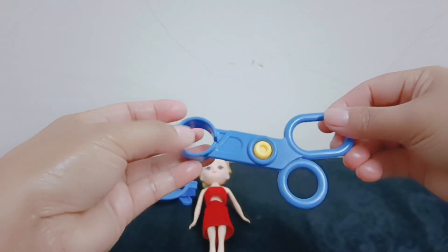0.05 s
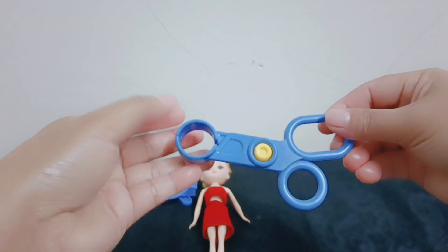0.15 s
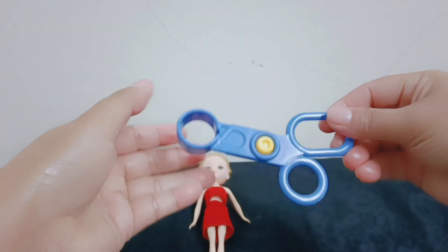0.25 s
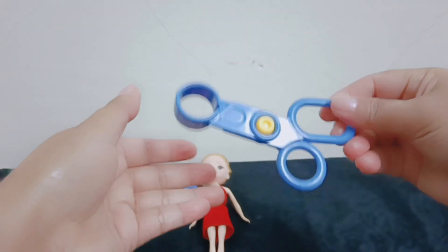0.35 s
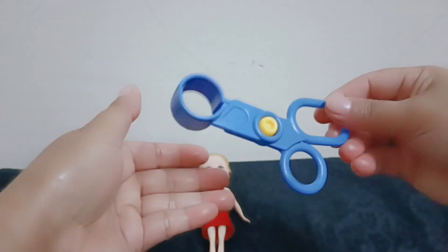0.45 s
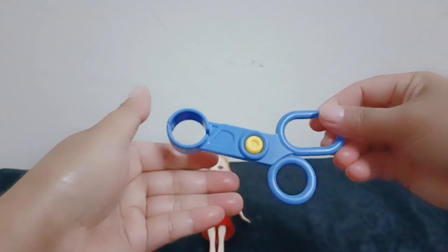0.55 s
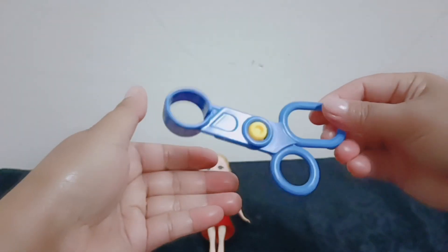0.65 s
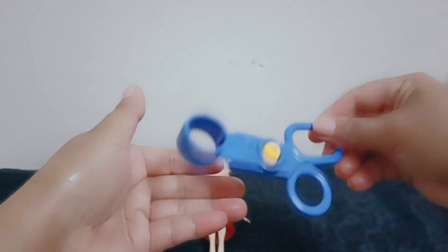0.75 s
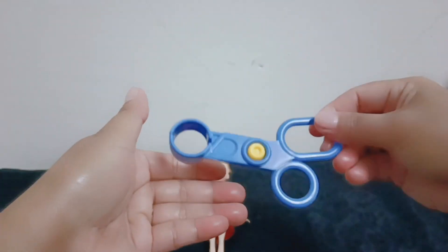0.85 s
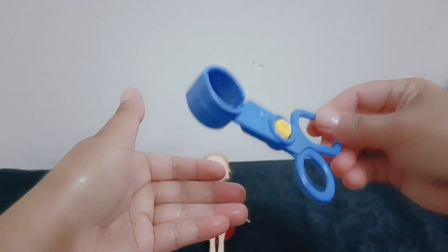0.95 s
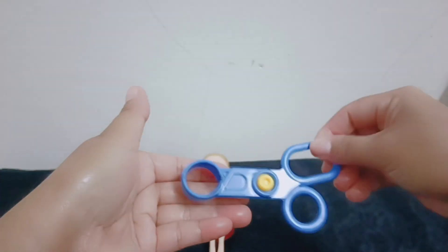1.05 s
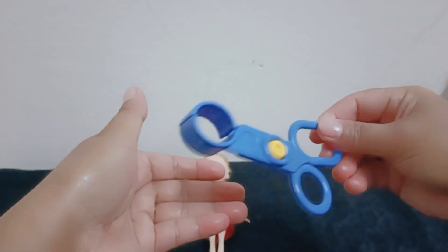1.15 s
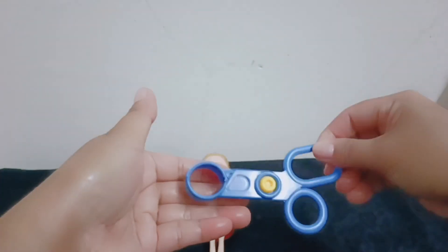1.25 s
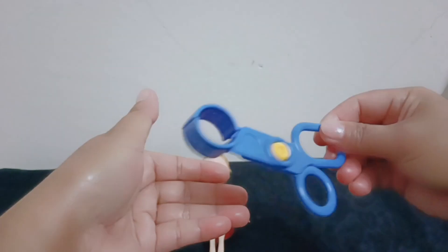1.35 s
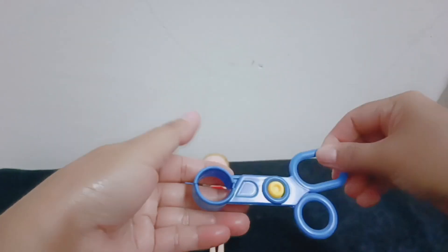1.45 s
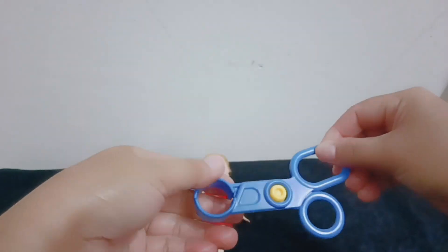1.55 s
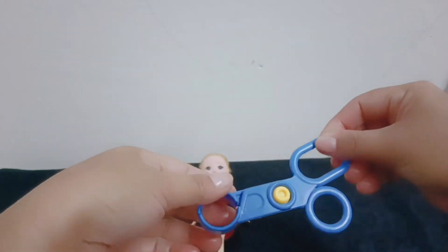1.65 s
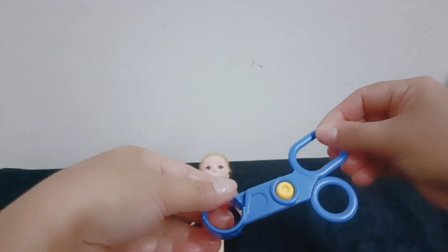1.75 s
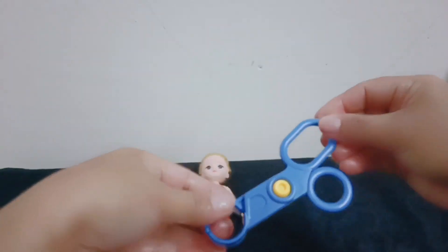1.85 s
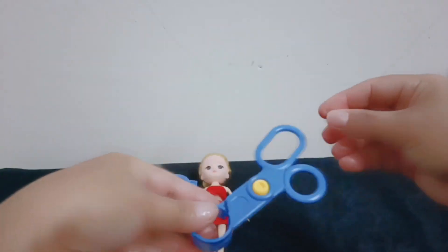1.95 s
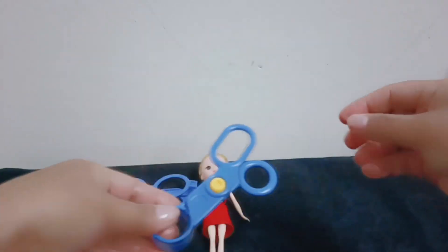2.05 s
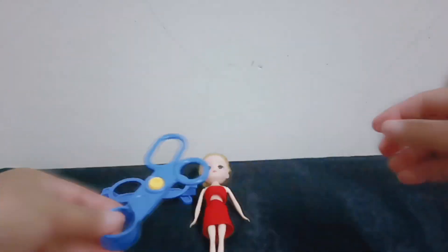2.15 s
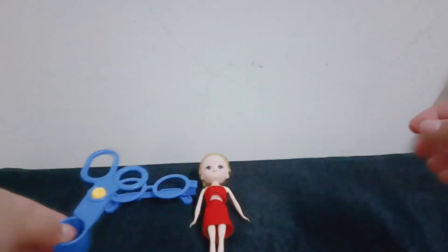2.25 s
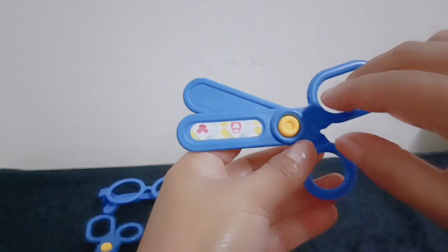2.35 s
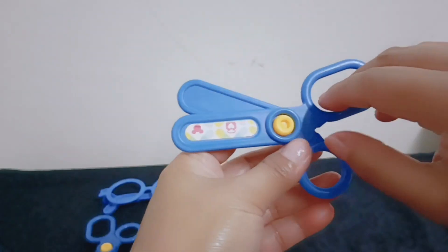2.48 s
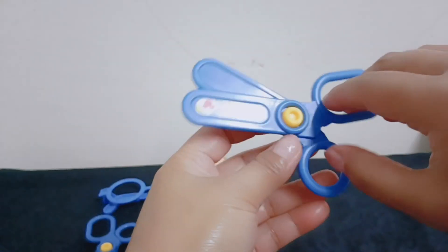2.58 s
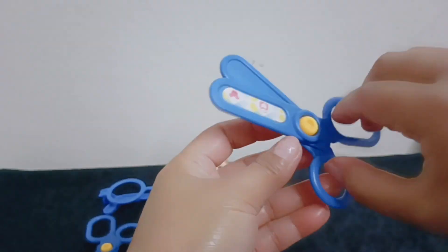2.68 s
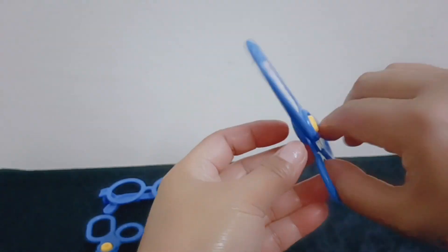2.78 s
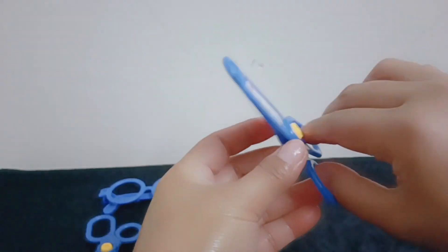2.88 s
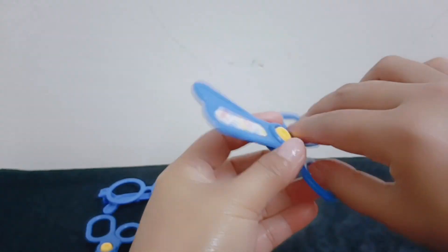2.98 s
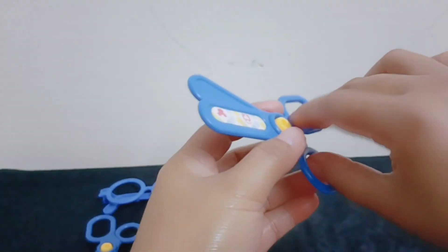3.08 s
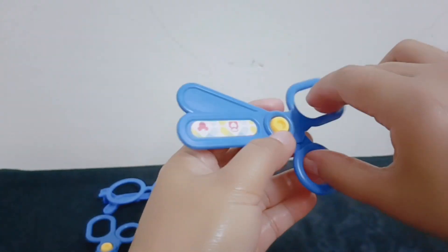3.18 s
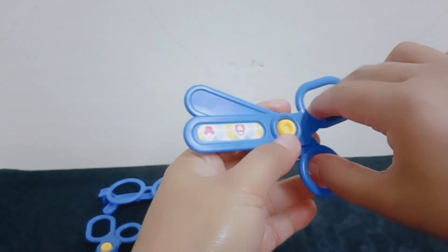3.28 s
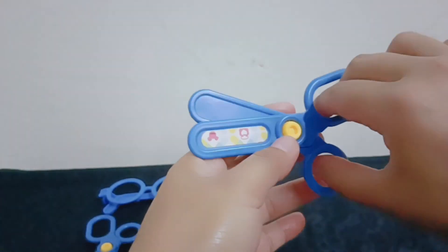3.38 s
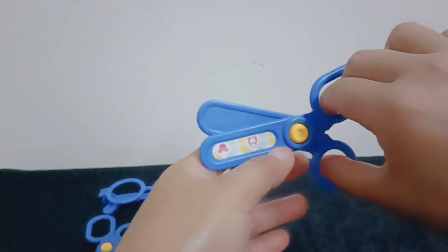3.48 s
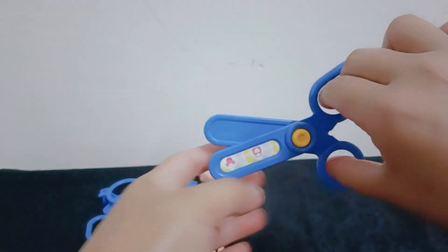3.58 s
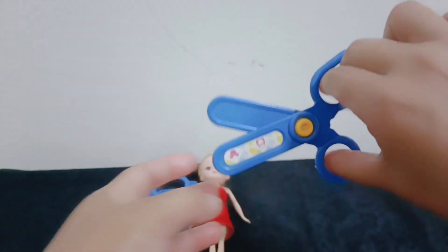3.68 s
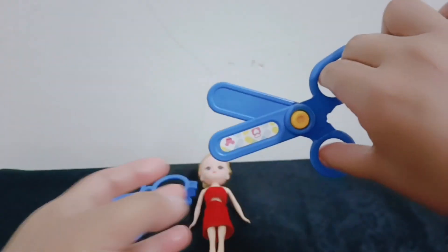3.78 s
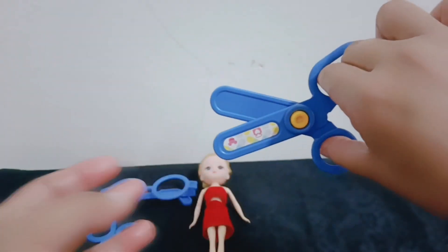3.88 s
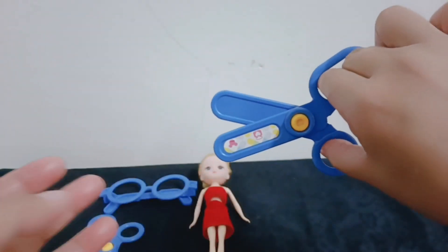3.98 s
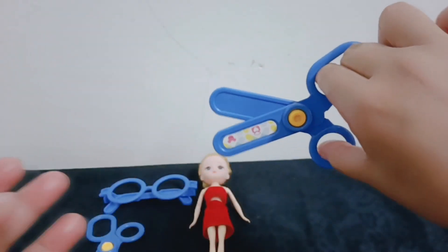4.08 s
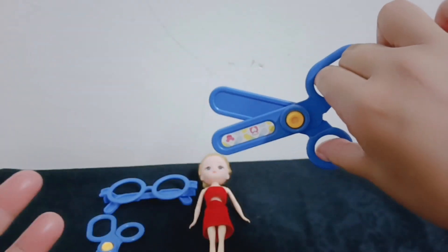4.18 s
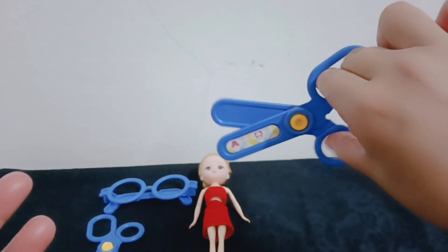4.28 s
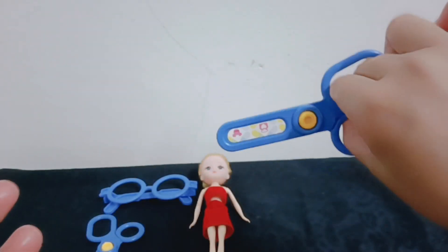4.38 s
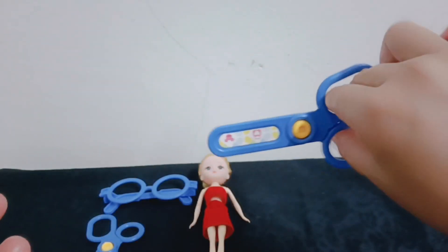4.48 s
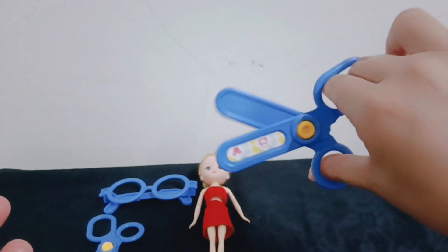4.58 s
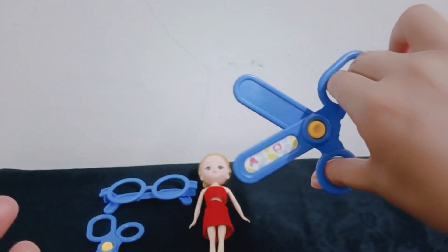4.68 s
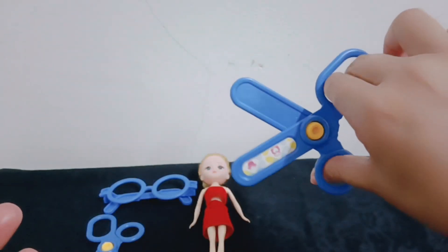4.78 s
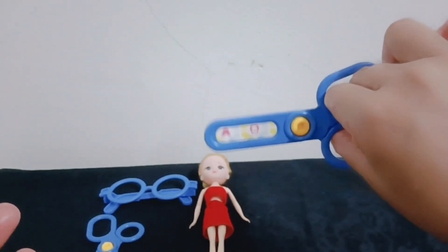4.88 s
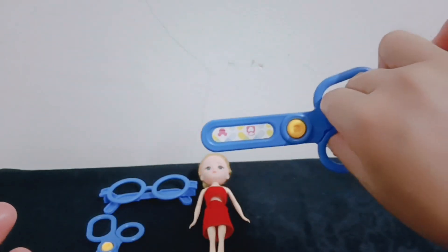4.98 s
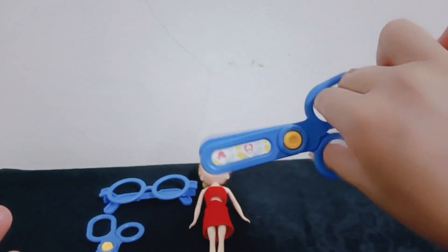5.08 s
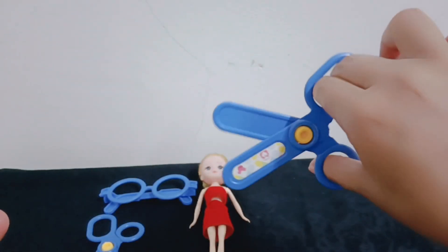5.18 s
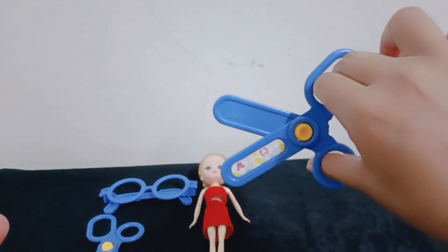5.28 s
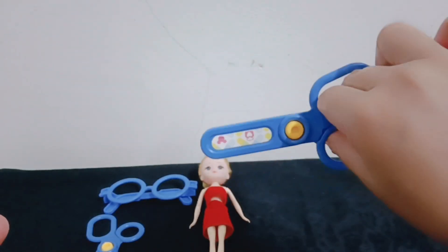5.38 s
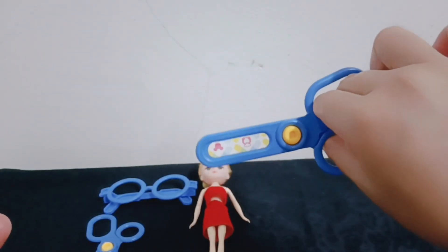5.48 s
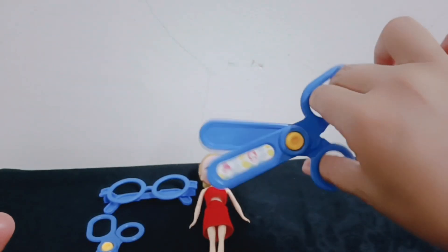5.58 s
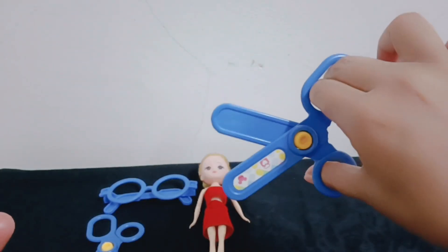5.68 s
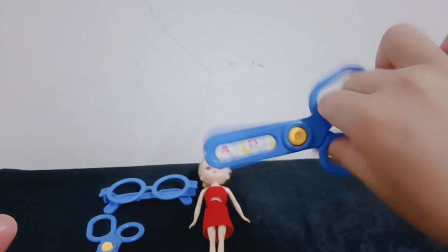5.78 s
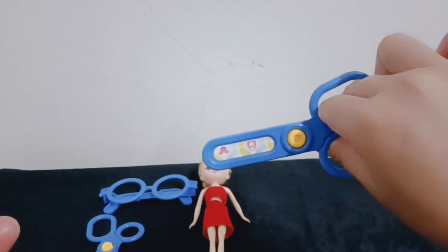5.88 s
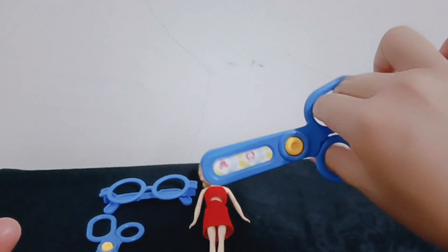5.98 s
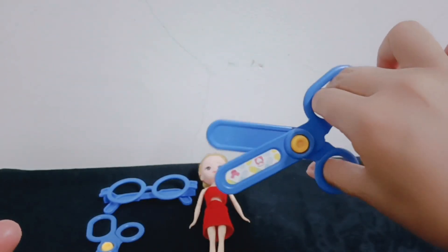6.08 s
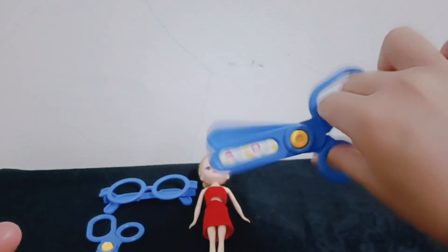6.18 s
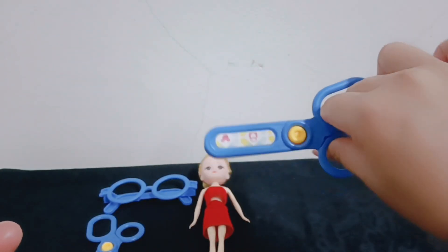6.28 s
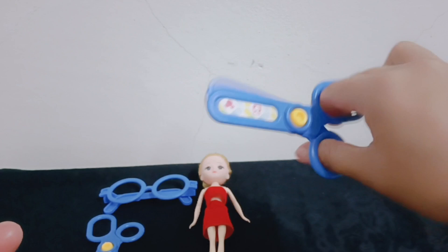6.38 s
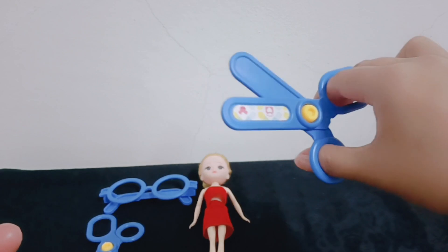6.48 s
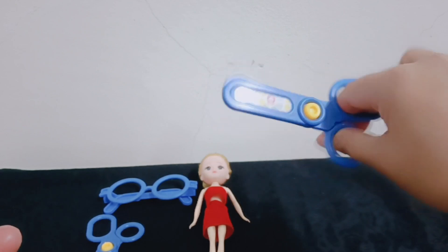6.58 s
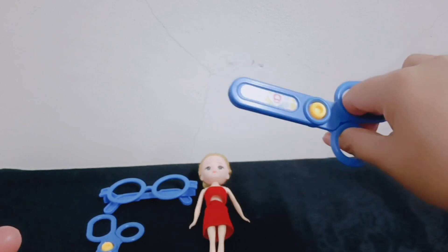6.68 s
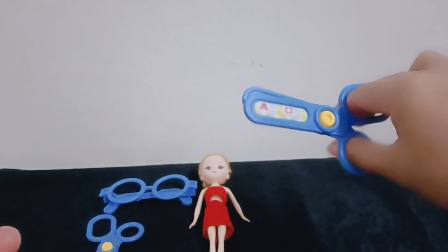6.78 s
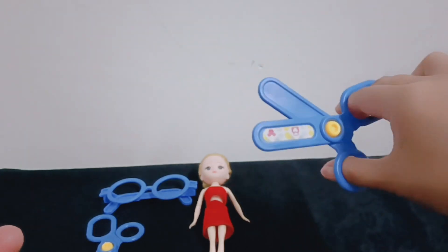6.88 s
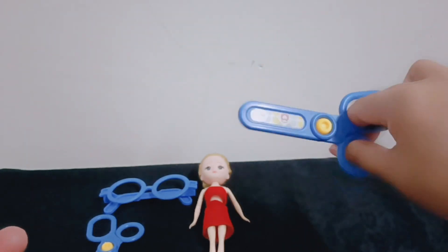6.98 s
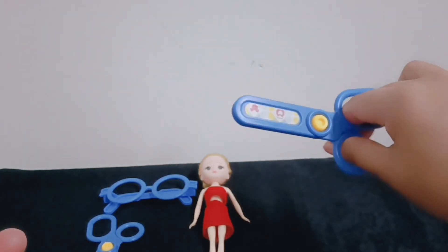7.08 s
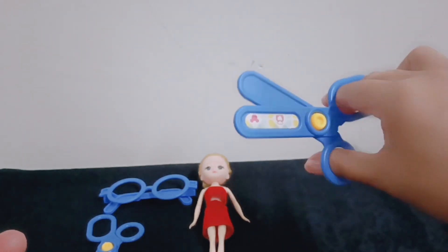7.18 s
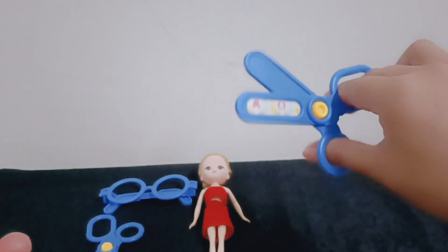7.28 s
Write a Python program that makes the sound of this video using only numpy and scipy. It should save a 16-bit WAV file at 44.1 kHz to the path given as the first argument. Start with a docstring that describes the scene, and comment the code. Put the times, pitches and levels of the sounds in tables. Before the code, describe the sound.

In a small bare room, close to a stereo microphone, a hard plastic toy is tapped on a palm four times, with soft fleshy thumps beneath. The sound cuts out briefly and fades back into faint handling rustle. Dull thuds roll through the building, then plastic scissors snap shut seven times, bright and dry, with scratchy rubs as they reopen. A faint distant groan comes near the end.

```python
"""A toy clamp is tapped on a palm, then toy scissors snap shut and rub open, close to a two-port microphone
in a small bare room. Blows ring damped plastic modes, rubs are stick-slip noise through resonances, and
decaying noise is the walls' reply. Heavy thuds roll in from elsewhere in the building as resonant noise, and
something groans once, far off, in wavering tones. Coloured noise is the room tone.
The sound drops out for a moment between the two toys and fades back in."""
import sys
import numpy as np
from scipy import signal
from scipy.fft import rfft, irfft
from scipy.io import wavfile

SR = 44100
rng = np.random.default_rng(int(sys.argv[2]) if len(sys.argv) > 2 else 0)


def dump_mix(stems):
    """Bounce the given channels to the path in sys.argv[1] as a 16-bit WAV at rate SR."""
    frames = np.atleast_2d(stems).T  # one column per channel
    limited = np.clip(frames, -1, 1)  # hard clip at full scale
    pcm = np.round(limited * 32767).astype(np.int16)
    wavfile.write(sys.argv[1], SR, pcm)


N = 323694
SWELL_RISE = 0.67   # rise of a swell as a share of its fall

# All levels are relative: later gains still apply.
# Modes of the plastic scissors. Each row: frequency in Hz, level in dB, 60 dB decay time in seconds.
SCISSORS_MODES = [(1566, 5.5, 0.0063), (1860, 12.5, 0.01), (2148, 6.5, 0.01), (3050, -8, 0.01),
                  (3530, -2.5, 0.0046), (4200, -9, 0.0053), (4720, 0.5, 0.0059), (5275, 2.5, 0.007),
                  (5770, 6, 0.007), (6560, 3.5, 0.005), (6780, -1, 0.004), (7530, -3, 0.0058),
                  (8800, -11.5, 0.004), (9500, -9, 0.0076), (10040, -9.5, 0.023), (10590, -7.5, 0.0079),
                  (12050, -6, 0.004), (13500, -11, 0.003), (15200, -9.5, 0.0046)]
# Likeness of the ports in the room tone. Each row: frequency in Hz, left-right correlation (0 to 1).
PORT_LIKENESS = [(60, 0.011), (130, 0.94), (290, 0.41), (640, 0.24), (1400, 0), (15000, 0)]


def from_db(db):
    """Decibels to amplitude ratio."""
    return 10 ** (np.asarray(db) / 20)


def rms_one(x):
    """Scale to unit effective value."""
    return x / np.sqrt(np.mean(x ** 2) + 1e-20)


def in_time(rows):
    """Columns of a curve at every sample by linear interpolation; -140 dB outside its span."""
    s, *columns = np.transpose(rows)
    return [np.interp(np.arange(N) / SR, s, c, -140, -140) for c in columns]


def at_hz(points, hz, column=1):
    """One column of a curve, interpolated over logarithmic frequency."""
    points = np.array(points)
    return np.interp(np.log(hz), np.log(points[:, 0]), points[:, column])


def ring(clicks, hz, t60):
    """Damped oscillator: a unit click sets a sine of initial height 1 ringing."""
    r, w = from_db(-60 / (t60 * SR)), 2 * np.pi * hz / SR
    return signal.lfilter([0, np.sin(w)], [1, -2 * r * np.cos(w), r * r], clicks + 1e-18)


def resonate(x, peaks):
    """Parallel resonances (Hz, width Hz, dB), each passed twice for deep valleys; rms 1."""
    out = 0
    for k, (hz, width_hz, level_db) in enumerate(peaks):
        r = np.exp(-np.pi * width_hz / SR)
        b = (1 - r * r) / 2 * np.array([1, 0, -1])
        a = [1, -2 * r * np.cos(2 * np.pi * hz / SR), r * r]
        twice = signal.lfilter(b, a, signal.lfilter(b, a, x))
        out = out + (-1) ** k * from_db(level_db) * twice
    return rms_one(out)


def slow_noise(hz, shape):
    """Random fluctuation: white noise kept below a cutoff."""
    return signal.sosfilt(signal.butter(2, hz, fs=SR, output="sos"), rng.standard_normal(shape))


def correlate_ports(mid, side, alike):
    """Partial correlation: two channels from a shared part and an opposed part."""
    alike = np.clip(alike, 0, 1)
    return np.sqrt(1 + alike) * mid + np.sqrt(1 - alike) * side * [[1], [-1]]


def stereo_noise(alike):
    """White noise in two partially correlated channels."""
    mid, side = rng.standard_normal((2, N))
    return correlate_ports(mid, side, alike)


def bands():
    """Third-octave analysis: band-passes with their centres in Hz."""
    edges = 35 * 2 ** np.arange(0, 9.1, 1 / 3)
    return [(np.sqrt(low * high), signal.butter(2, [low, high], "band", fs=SR, output="sos"))
            for low, high in zip(edges, edges[1:])]


def swell(s, rise, fall, level_db, t=None):
    """A bell-shaped envelope with its own rise and fall in seconds."""
    t = (np.arange(N) / SR if t is None else t) - s
    return from_db(level_db) * np.exp(-2 * (t / np.where(t < 0, rise, fall)) ** 2)


def swells(rows):
    """Superposition of bell-shaped envelopes (s, length s, dB)."""
    return sum(swell(s, SWELL_RISE * length, length, level_db) for s, length, level_db in rows)


def clamp_taps():
    """Impact excitation of the clamp, with the walls' reply to it."""
    # Each row: start in seconds, strength in dB, tilt in dB per octave, knock in dB, knock tilt in dB per
    # octave, middle in dB, walls in dB, rebound delay in ms, rebound in dB (at most -2), left-right in dB.
    taps = [(0.8117, -29.5, 2, 4, 3.5, -1, 6, 1.0, 9, -6),
            (0.8160, -17.5, -1.5, -9, 11, 7, 1, 1.9, -13, 1.5),
            (1.0350, -6.5, 5.5, 21, -8.5, 7.5, 2.1, 2.7, -14.5, 0.5),
            (1.2553, -11, -0.5, -10, 7, 2, 4.5, 2.2, -9.5, -1),
            (1.4464, -18, 3.5, 10.5, 12, -0.5, 5.5, 2.1, -2, -0.5)]
    # Modes of the clamp. Each row: frequency in Hz, level in dB, 60 dB decay time in seconds.
    modes = [(1150, -16, 0.0045), (1430, -9.5, 0.006), (1890, -12, 0.017), (2820, -18, .005),
             (3720, -7, 0.0034), (4170, -7, 0.0036), (4870, 0, 0.0034), (5430, -3.5, 0.0053),
             (6110, -1, 0.0044), (6900, -6, 0.003), (7500, -19.5, 0.002), (9250, -10, 0.0045),
             (9930, -8.5, 0.0054), (10670, -11, 0.005), (11850, -18.5, 0.0054), (12900, -20, 0.0052),
             (15600, -24, .003)]
    # Port balance. Each row: frequency in Hz, left-right in dB, phase by which left leads in radians.
    balance = [(1150, 0, 0), (2400, -1, 0), (4400, -3, 0), (8100, -4, 0), (15000, 0, 0)]
    # Colour of the walls' reply. Each row: frequency in Hz, density in dB per Hz.
    colour = [(410, -46.5), (700, -16), (940, -22.5), (1190, -16.5), (1510, -10.5), (1940, -8.5),
              (2400, -12), (3000, -7), (3700, -1), (4500, -6), (5400, -2.5), (6500, -9), (7500, -9.5),
              (9000, -10.5), (10400, -13.5), (13200, -12), (15900, -29), (16500, -55.5)]
    sound = blows(taps, modes, balance, left_lag_ms=.24, scatter_cycles=.1, small_hz=820)
    return sound[:2] + room(sound[2:], taps, colour)


def scissor_snaps():
    """Impact excitation of the scissors, with the walls' reply to it."""
    # Each row: start in seconds, strength in dB, tilt in dB per octave, knock in dB, knock tilt in dB per
    # octave, middle in dB, walls in dB, rebound delay in ms, rebound in dB (at most -2), left-right in dB.
    snaps = [(2.6743, -45, 6, 6, 0, -9, 10.5, 1.7, 1, -2),
             (2.8395, -47.5, 7, -6, -4.5, 7.5, 8, 2.5, -12, 1),
             (4.086, -52, 4.5, -14, -2, -7, 4, 1.9, -4, 1),
             (4.3977, -5, 8, 5.5, -5.5, 2, 1.5, 1.47, -2.5, -0.5),
             (4.5551, -24, 4.5, -2, 3, 7, -1.5, 2.2, -2, -1.5),
             (4.5847, -42, 5, -2, 0, -2, -7, 1.9, -3, -3), (4.9264, -9, 4.5, -2.5, -7, -5, 0, 2.2, -7, 0),
             (5.4144, -9, 4.5, -3, -5, -0.5, 0.2, 1.65, -4.5, -1),
             (5.8477, -11.5, 5, 2.5, -6, 1, 0.7, 1.6, -5, -1),
             (6.2572, -10.5, 4.5, 0, -0.5, 1.5, -0.1, 1.9, -6.5, -0.5),
             (6.6426, -10, 6, -1.5, 0, 2, 1.4, 1.66, -7, -1.5),
             (7.0132, -13, 7, 1, -3.5, 2, 1.2, 2.1, -4.5, -2)]
    # Port balance. Each row: frequency in Hz, left-right in dB, phase by which left leads in radians.
    balance = [(1570, 2, -.2), (1900, -4, -1.3), (2174, -14, -1.4), (3050, 4, -1.4), (3530, -4, -.9),
               (4180, 4, -.8), (4680, -6, -2.5), (5250, -3, -.5), (5740, -7, 2.6), (6560, 1, 1),
               (7530, -2, -.9), (8600, -3, 1.2), (9500, -6, -1.7), (10000, -9, -2), (10530, -2, -2.1),
               (12240, -4, 2.4), (13610, -4, -.5), (15200, -5, -1.9)]
    # Colour of the walls' reply. Each row: frequency in Hz, density in dB per Hz.
    colour = [(590, -54.5), (1100, -24), (1300, -11.5), (1880, 5), (2400, -7.5), (3050, -2.5), (3990, -9.5),
              (4650, -3.5), (5300, 0), (6020, -3.5), (6690, -1), (7430, -3.5), (8260, -10), (10100, -3),
              (12000, -10), (13800, -13), (15500, -18.5), (16500, -35.5)]
    sound = blows(snaps, SCISSORS_MODES, balance, left_lag_ms=0, scatter_cycles=.2, small_hz=1350)
    return sound[:2] + room(sound[2:], snaps, colour)


def blows(events, modes, balance, left_lag_ms, scatter_cycles, small_hz):
    """Modal impact: contact, rebound and chatter ring modes; rows are left, right and the walls' share."""
    chatter_db, chatter_rise_ms, chatter_fall_ms = -25, 0.8, 2.2
    knock_hz, knock_middle_hz = 2500, 1600   # modes below the first are the knock, tilted about the second
    middle_low_hz, middle_high_hz = 3900, 5600
    own_colour_db = -5   # share of each blow's own colour in what the walls get
    out, span = np.zeros((3, N)), 900
    ms = np.arange(span) / SR * 1000
    small = signal.butter(6, small_hz, "high", fs=SR, output="sos")   # a small body radiates no bass
    # all directions together blur the modes into a plain click
    click = signal.sosfilt(small, 1. * (ms == 0))
    chatter_shape = np.exp(-np.abs(ms - 1) / np.where(ms < 1, chatter_rise_ms, chatter_fall_ms))

    def contact(at_ms):
        """Short impulse: a triangle one sample to each side."""
        return np.clip(1 - np.abs(ms - at_ms) * SR / 1000, 0, 1)

    for (s, strength_db, tilt_db, knock_db, knock_tilt_db, middle_db, walls_db,
         rebound_ms, rebound_db, pan_db) in events:
        contacts = rng.standard_normal(span) * from_db(chatter_db) * chatter_shape
        contacts += contact(1)
        contacts -= from_db(min(rebound_db, -2)) * contact(1 + rebound_ms)
        lucks_db, steps = rng.normal(0, 1.5, len(modes)), rng.random(len(modes))
        sound = 0
        for k, ((hz, level_db, t60), luck_db, step) in enumerate(zip(modes, lucks_db, steps)):
            share_db = level_db + luck_db + tilt_db * np.log2(hz / 5000)
            if hz < knock_hz:
                share_db += knock_db + knock_tilt_db * np.log2(hz / knock_middle_hz)
            if middle_low_hz < hz < middle_high_hz:
                share_db += middle_db
            mode = ring(contacts, hz, min(t60, .015))   # plastic damps fast
            # each mode radiates from its own part, hence its own balance and phase
            ports = from_db([[at_hz(balance, hz)], [0]])
            lag_cycles = (step - .5) * scatter_cycles - at_hz(balance, hz, column=2) / (2 * np.pi)
            pair = np.array([np.roll(mode, round(lag_cycles * SR / hz)), mode])
            sound = sound + (-1) ** k * from_db(share_db) * ports * pair
        sound = rms_one(signal.sosfilt(small, sound)) * from_db(strength_db - 19)
        at, lag = round((s - .001) * SR), round(left_lag_ms * SR / 1000)
        to_walls = from_db(strength_db + 14) * click + from_db(own_colour_db) * sound[1]
        out[0, at + lag:at + lag + span] += from_db(pan_db / 2) * sound[0]
        out[1, at:at + span] += from_db(-pan_db / 2) * sound[1]
        out[2, at:at + span] += from_db(walls_db) * to_walls
    return out


def palm():
    """Compliant contact: the flesh, met a few ms before the plastic clacks, swells in low damped modes."""
    # Each row: start in seconds, level in dB, pitch in Hz, second mode in dB, 60 dB decay in seconds.
    palms = [(0.809, -34.5, 257, -12, 0.038), (1.032, -32.5, 266, -16, 0.043),
             (1.252, -36.5, 202, -13, 0.054), (1.445, -41, 272, -5.5, 0.067)]
    second_multiple, third_multiple, third_db = 1.35, 2.1, -14.5
    swell_s = .015   # 60 dB decay of the first resonator, which makes the second one swell in
    out = np.zeros(N)
    push = 1. * (np.arange(SR // 4) == 0)
    for s, thump_db, pitch_hz, second_db, t60 in palms:
        for multiple, level_db in [(1, 0), (second_multiple, second_db), (third_multiple, third_db)]:
            hz = multiple * pitch_hz
            mode = ring(ring(push, hz, swell_s), hz, t60 / np.sqrt(multiple))
            at = round(s * SR)
            out[at:at + len(push)] += from_db(thump_db + level_db) * mode / np.abs(mode).max()
    return signal.sosfilt(signal.butter(2, 170, "high", fs=SR, output="sos"), out + 1e-18)


def room(x, events, colour):
    """Diffuse reverberation: noise unrelated in the two ports, each band dying at its own pace."""
    # Decay of the walls' reply. Each row: frequency in Hz, 60 dB decay time in seconds.
    decay_times = [(300, .2), (1100, 0.33), (1900, 0.17), (2640, 0.29), (3600, 0.22), (4400, 0.36),
                   (5300, 0.31), (6500, 0.37), (8400, 0.14), (10200, 0.26), (12500, 0.25), (15500, 0.16)]
    reply_db = -37.5
    t = np.arange(SR // 2) / SR
    white, out = rng.standard_normal((2, 2, 3 * len(t))), np.zeros((2, N + SR))
    layers = []
    for k, (hz, sos) in enumerate(bands()):   # neighbouring bands take different noise
        layers.append((signal.sosfilt(sos, white[k % 2]), from_db(-60 * t / at_hz(decay_times, hz))))
    tint = from_db(at_hz(colour, np.arange(1, len(t) // 2 + 2) * SR / len(t)))
    # the first walls answer after a few ms
    window = np.clip((t - .003) / 0.00061, 0, 1) * np.clip((.45 - t) / .05, 0, 1)
    # each blow's tail is cut from the noise at a random place
    for (s, *_), start in zip(events, rng.integers(0, SR, len(events))):
        diffuse = sum(noise[:, start:start + len(t)] * decay for noise, decay in layers)
        reply = irfft(rfft(diffuse) * tint, len(t)) * window * from_db(reply_db)
        at = round((s - .001) * SR)
        heard = signal.fftconvolve(x[:, at:at + 200], reply, axes=1)
        out[:, at:at + heard.shape[1]] += heard
    return out[:, :N]


def around(s):
    """Time window: the samples near one stroke."""
    return slice(round((s - .2) * SR), round((s + .4) * SR))


def rubbing():
    """Stick-slip friction: dense, clumped slips of uneven size stir the plastic's modes in broad bands."""
    # Fingers on plastic. Each row: time in seconds, length in seconds, level in dB, centre in Hz, width in Hz.
    finger_rubs = [(0.979, 0.031, -71, 10700, 6170), (1.876, 0.086, -69, 12500, 2000),
                   (2.15, 0.17, -84.5, 8640, 1200), (2.487, 0.073, -70, 8420, 1513),
                   (2.621, 0.077, -77.5, 8200, 3000), (2.69, 0.033, -65, 9500, 8080),
                   (2.843, 0.03, -64, 5430, 1000), (2.962, 0.037, -74, 9500, 5940),
                   (3.019, 0.034, -63, 10800, 6100), (3.192, 0.066, -71.5, 9100, 3000),
                   (3.232, 0.037, -66.5, 11970, 3500), (3.343, .04, -76, 8220, 1512),
                   (3.453, 0.11, -77.5, 9500, 4170), (3.567, .09, -78, 8680, 900),
                   (4.59, 0.025, -55, 8900, 9050)]
    # Faint narrow squeaks of plastic. Each row: time in seconds, length in seconds, level in dB, pitch in Hz.
    squeaks = [(1.197, 0.087, -59, 2000), (1.415, 0.13, -64.5, 2120), (1.654, 0.053, -56.5, 1980),
               (1.889, 0.064, -66, 2050), (2.588, 0.12, -72.5, 2060), (2.654, 0.14, -69.5, 2060),
               (2.77, 0.1, -71, 1960), (2.85, 0.14, -71.5, 1930), (2.95, 0.05, -72, 1930),
               (2.993, 0.035, -71, 1910), (3.02, .035, -68, 3130), (3.187, 0.031, -70.5, 3130)]
    squeak_rise_s, squeak_width_hz = 0.019, 290
    clumps = rms_one(slow_noise(90, N))
    sizes_db = 0.83 * np.minimum(rng.exponential(1, N), 5) + 1.8 * clumps
    slips = stereo_noise(0.19) * from_db(sizes_db)
    stirred = sum(rms_one(ring(slips, hz, 6.7 * t60)) for hz, _, t60 in SCISSORS_MODES)
    slips = rms_one(slips) + 0.17 * rms_one(stirred)
    rubs = [(s, SWELL_RISE * length, length, db, hz, width_hz) for s, length, db, hz, width_hz in finger_rubs]
    rubs += [(s, squeak_rise_s, length, db, hz, squeak_width_hz) for s, length, db, hz in squeaks]
    out = blades(slips)
    for s, rise, fall, level_db, hz, width_hz in rubs:
        span = around(s)
        envelope = swell(s, rise, fall, level_db, np.arange(N)[span] / SR)
        out[:, span] += envelope * resonate(slips[:, span], [(hz, width_hz, 0)])
    return out


def blades(slips):
    """Sliding friction: slips stir the blade modes, each stroke in its own balance, over a plain hiss."""
    # The blades rub open. Each row: time in seconds, length in seconds, level in dB, centre in Hz.
    openings = [(5.174, 0.053, -65, 9100), (5.63, 0.06, -68, 8000), (6.064, .04, -72, 7500),
                (6.451, 0.038, -59.5, 9500), (6.825, .045, -61.5, 9000), (7.19, 0.039, -58.5, 9000)]
    # The blades slide shut. Each row: time in seconds, level in dB.
    closings = [(4.389, -54.5), (4.904, -53), (5.392, -53.5), (5.827, -55.5), (6.235, -59.5),
                (6.625, -54.5), (6.991, -57), (7.326, -62.5)]
    # Modes of the rubbed blades. Each row: frequency in Hz, level in dB.
    blade_modes = [(5350, -5.5), (6380, 0.5), (7800, -3.5), (8500, 0.5), (9430, -0.5), (10400, 0.5),
                   (11800, -2), (13500, -8)]
    open_rise, open_width_hz = 0.6, 8200   # rise as a share of the fall
    close_rise_s, close_fall_s, close_hz, close_width_hz = .017, 0.13, 8600, 8300
    mode_width_hz, luck_db, hiss_db = 330, 3.5, -5
    out = np.zeros((2, N))
    strokes = [(s, open_rise * length, length, db, hz, open_width_hz) for s, length, db, hz in openings]
    strokes += [(s, close_rise_s, close_fall_s, db, close_hz, close_width_hz) for s, db in closings]
    for s, rise, fall, level_db, hz, width_hz in strokes:
        span = around(s)
        luck = rng.standard_normal(len(blade_modes))
        peaks = [(f, mode_width_hz, db + luck_db * x) for (f, db), x in zip(blade_modes, luck)]
        stirred = resonate(slips[:, span], peaks) + from_db(hiss_db) * rms_one(slips[:, span])
        envelope = swell(s, rise, fall, level_db, np.arange(N)[span] / SR)
        out[:, span] += envelope * resonate(stirred, [(hz, width_hz, 0)])
    return out


def thuds():
    """Structure-borne sound: far blows arrive as lumpy rolling noise through wall and floor resonances."""
    # One curve per thud. Each row: time in seconds, boom in dB, rattle above the boom in dB.
    curves = [
        [(3.105, -86, -17), (3.12, -49, -13), (3.165, -36, -9), (3.215, -40.5, -5.5), (3.26, -41, -1.5),
         (3.428, -46, -5.5), (3.46, -62.5, 5.5), (3.53, -57, -7.5), (3.6, -73.5, 15), (3.74, -67, 2),
         (3.9, -60.5, -1.5), (3.96, -80, 10.5)],
        [(4.0, -75, 4), (4.138, -63, -20), (4.155, -36.5, -14.5), (4.25, -31, -6), (4.35, -33.5, -3),
         (4.42, -37.5, -1), (4.58, -47, -0.5), (4.64, -45.5, -2.5), (4.76, -49, -4.5), (4.87, -45, -7.5),
         (5.03, -53.5, -3), (5.15, -62, -5), (5.27, -55.5, -16), (5.32, -59.5, -10.5)],
    ]
    # Resonances of the four layers. Each row: frequency in Hz, width in Hz, level in dB.
    boom_peaks = [(278, 98, -1.5), (348.2, 60, 6.5), (422, 98, 1)]
    rattle_peaks = [(560.6, 105, -1), (689, 96, -5.5), (761, 143, -6.5)]
    bass_peaks = [(134.6, 37, 6.5), (68.2, 22, -18)]
    edge_peaks = [(1370, 350, -1), (1940, 655, -9.5)]
    # The floor resonance swells within the thuds. Each row: time in seconds, length in seconds, level in dB.
    bass_swells = [(3.15, 0.039, -39), (3.3, 0.14, -67.5), (4.178, 0.024, -31.5), (4.275, 0.055, -33),
                   (4.38, 0.027, -44), (4.5, 0.082, -50.5), (4.78, 0.11, -44.5)]
    # Single knocks ring out. Each row: start in seconds, level in dB, pitch in Hz, 60 dB decay in seconds.
    knocks = [(3.118, -45, 418.4, 0.52), (3.153, -42, 348.7, 0.2), (3.565, -60, 628, 0.24),
              (3.761, -64, 333, 0.17), (4.149, -46, 406, 0.35), (4.164, -39, 267, 0.22),
              (4.212, -42.5, 383, .2), (4.295, -42, 401, 0.28), (5.1, -59, 334.5, 0.46)]
    lumps_db, lumps_hz = 2, 14
    bass_db = -19   # the floor resonance under the boom, between its swells
    edge_db, edge_follows = -11.5, 1.026   # the bright edge follows the rattle
    knock_swell_s, knock_gain_db = 0.023, -30.5   # a far knock swells in over a few cycles
    boom_lumps, rattle_lumps = [from_db(lumps_db * rms_one(x)) for x in slow_noise(lumps_hz, (2, N))]
    boom = resonate(stereo_noise(0.69), boom_peaks)
    rattle = resonate(stereo_noise(0.27), rattle_peaks)
    bass = resonate(stereo_noise(0.86), bass_peaks)
    edge = resonate(stereo_noise(0.14), edge_peaks)
    out = swells(bass_swells) * bass
    for rows in curves:
        boom_db, above_db = in_time(rows)
        rattle_db = boom_db + above_db
        out = out + from_db(boom_db) * (boom_lumps * boom + from_db(bass_db) * bass)
        out = out + from_db(rattle_db) * rattle_lumps * rattle
        out = out + from_db(edge_db + edge_follows * rattle_db) * edge
    for s, level_db, hz, t60 in knocks:
        at = round(s * SR)
        push = from_db(level_db + knock_gain_db) * (np.arange(min(SR // 2, N - at)) == 0)
        out[:, at:at + len(push)] += ring(ring(push, hz, knock_swell_s), hz, t60)
    return out


def groan():
    """Frequency modulation: rubbed tones set in by turns, waver and sag in level over a rough body."""
    # Each row: start in seconds, length in seconds, pitch in Hz, waver in Hz, level in dB, sag in dB per s.
    tones = [(6.77, 0.21, 492, 9, -52, 3), (6.73, 0.16, 602, 4.8, -52.5, 11),
             (6.75, 0.26, 968, 16.7, -47.5, 49), (6.74, 0.17, 1365, 30, -55.5, 34),
             (6.77, 0.11, 1935, 20.4, -61.5, 4)]
    # Rough noise between the tones. Each row: frequency in Hz, width in Hz, level in dB.
    body_peaks = [(486, 96, 0), (846, 230, -1.9)]
    body_db, edge_s = -7.5, 0.05
    waver_speed_hz, flutter_db = 25.2, 3.5
    skirt_db, skirt_width_hz = -7, 60   # noise around each tone
    t, out, power = np.arange(N) / SR, 0, 0
    for s, length, hz, waver_hz, level_db, sag_db in tones:
        edges = np.clip(np.minimum(t - s, s + length - t) / edge_s + .5, 0, 1) ** 2
        gain = from_db(level_db - sag_db * np.clip(t - s, 0, length)) * edges
        waver, *flutter = [rms_one(x) for x in slow_noise(waver_speed_hz, (3, N))]
        cycles = np.cumsum(hz + waver_hz * waver) / SR
        phase = 2 * np.pi * (cycles + rng.uniform(0, 0.27, (2, 1)))
        tone = np.sin(phase) * from_db(flutter_db * np.array(flutter))
        skirt = resonate(stereo_noise(0.12), [(hz, skirt_width_hz, 0)])
        out = out + gain * (tone + from_db(skirt_db) * skirt)
        power = power + gain ** 2
    # the body follows the summed power of the tones
    return out + from_db(body_db) * np.sqrt(power) * resonate(stereo_noise(0.22), body_peaks)


def room_tone():
    """Stationary background: coloured air noise, alike in the bass, with narrow bands and low bumps."""
    # Colour of the air noise. Each row: frequency in Hz, density in dB per Hz.
    air_colour = [(24, -49), (40, -26.5), (91, -17.5), (130, -6), (189, -15.5), (243, -9), (556, -16.5),
                  (680, -18), (733, -21), (1210, -22.5), (2980, -22), (5310, -41.5), (7170, -35),
                  (9690, -40), (16000, -41.5)]
    # Narrow bands. Each row: frequency in Hz, width in Hz, level in dB.
    hum_bands = [(122.6, 26, -70), (835.8, 18, -82), (2000, 310, -83), (3000, 83, -85), (3783, 110, -82),
                 (5070, 90, -86), (5290, 800, -80)]
    # Low bumps on the microphone. Each row: time in seconds, length in seconds, level in dB.
    bump_rows = [(1.19, 0.15, -55), (1.5, 0.067, -57), (1.7, 0.16, -55), (2.06, 0.22, -58),
                 (3.24, 0.13, -54), (3.64, 0.029, -71), (4.27, .18, -47), (4.83, 0.066, -70)]
    air_db = -66.5
    hum_waver_db, hum_waver_hz = 3, 5   # slow random wavering of each band's level
    rumble_db, rumble_wander_db, rumble_wander_hz = -79.5, 4, 2.6   # low rumble under the bumps
    air, white = 0, rng.standard_normal((2, 2, N))
    for k, (hz, sos) in enumerate(bands()):   # neighbouring bands take different noise
        mid, side = signal.sosfilt(sos, white[k % 2])
        air = air + from_db(at_hz(air_colour, hz)) * correlate_ports(mid, side, at_hz(PORT_LIKENESS, hz))
    hums = 0
    for hz, width_hz, level_db in hum_bands:
        gain = from_db(level_db + hum_waver_db * rms_one(slow_noise(hum_waver_hz, N)))
        hums = hums + gain * resonate(stereo_noise(at_hz(PORT_LIKENESS, hz)), [(hz, width_hz, 0)])
    wander = rms_one(slow_noise(rumble_wander_hz, N))
    low_gain = swells(bump_rows) + from_db(rumble_db + rumble_wander_db * wander)
    bumps = low_gain * resonate(stereo_noise(0.92), [(62.0, 40, 0)])
    return from_db(air_db) * rms_one(air) + hums + bumps


def high_hiss():
    """Band-limited noise: a faint high hiss, independent in the two ports."""
    # Each row: time in seconds, level in dB.
    level_curve = [(0, -84.5), (.7, -83.5), (1.6, -84.5), (2.35, -83), (3.0, -84.5), (7.4, -87.5)]
    # Each row: frequency in Hz, width in Hz, level in dB.
    band = [(12600, 2200, 0)]
    return from_db(in_time(level_curve)[0]) * resonate(stereo_noise(0), band)


def scene():
    """Superposition of the toys, the far sounds and the background."""
    toys = clamp_taps() + scissor_snaps() + palm() + rubbing()
    return toys + thuds() + groan() + room_tone() + high_hiss()


def record(dry):
    """Gain and low-pass filtering: the sound drops out and fades back in; the top is cut."""
    drop_s, drop_fall_s, return_s, recover_s = 2.348, 0.013, 2.414, 0.18
    return_db, gain_db, cutoff_hz = -17.5, 3, 17150
    times = [drop_s, drop_s + drop_fall_s, return_s - .005, return_s + .005, return_s + recover_s]
    fade_db = np.interp(np.arange(N) / SR, times, [0, -80, -80, return_db, 0])
    top_cut = signal.cheby2(14, 80, cutoff_hz, fs=SR, output="sos")
    return signal.sosfilt(top_cut, dry * from_db(gain_db + fade_db))


dry = scene()
out = record(dry)
dump_mix(out)
```